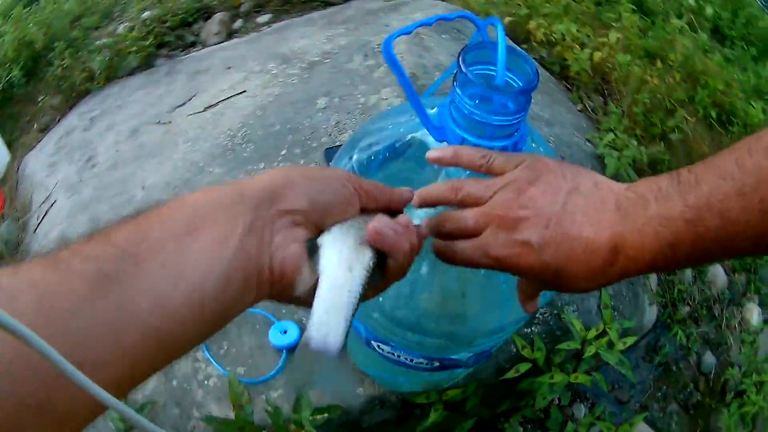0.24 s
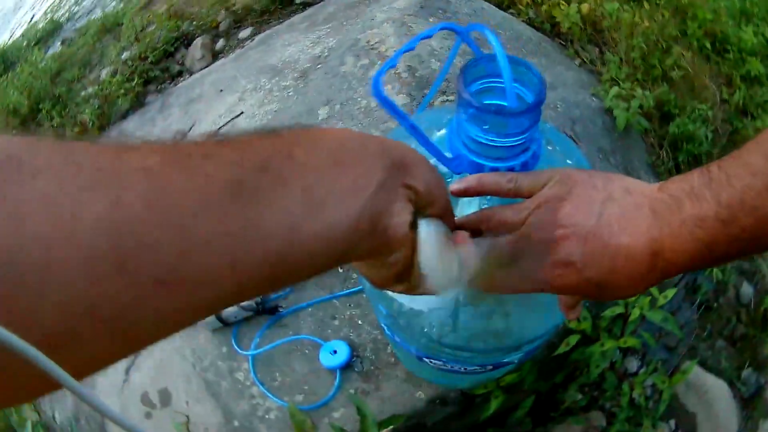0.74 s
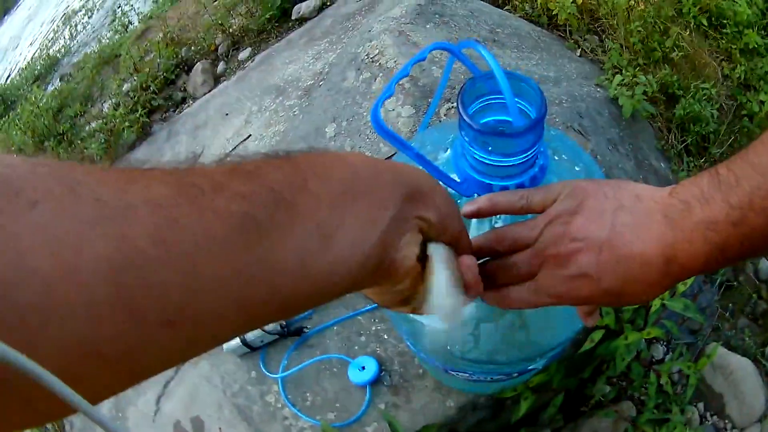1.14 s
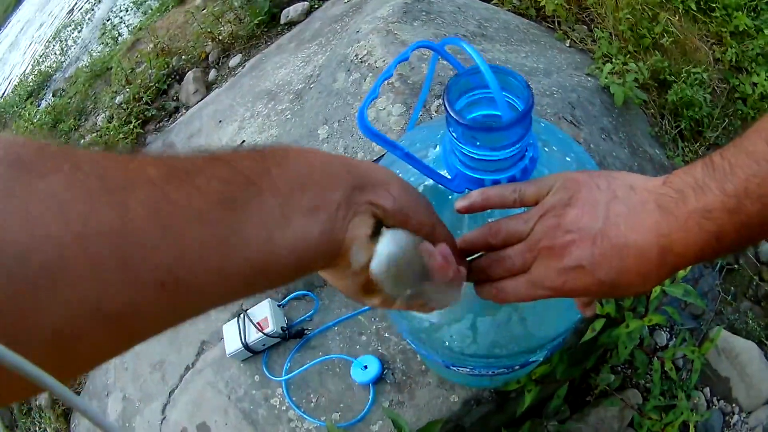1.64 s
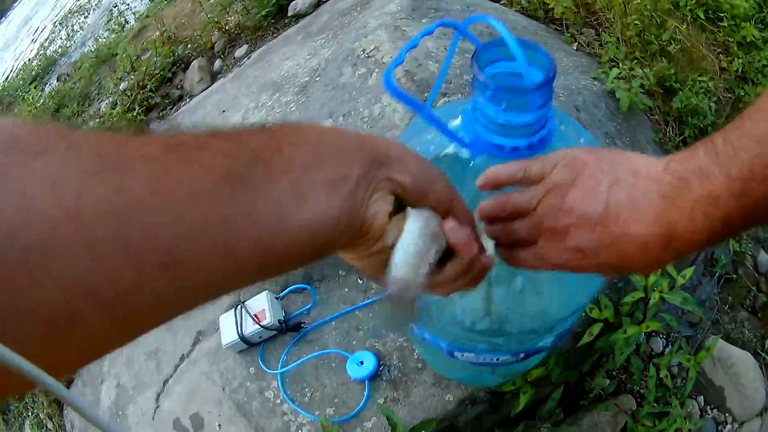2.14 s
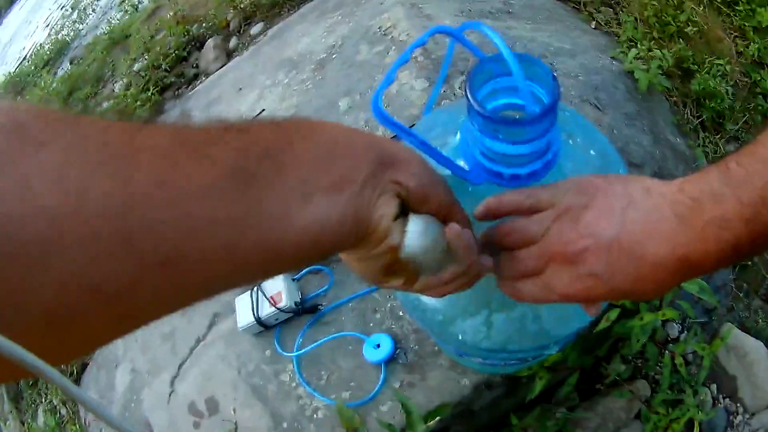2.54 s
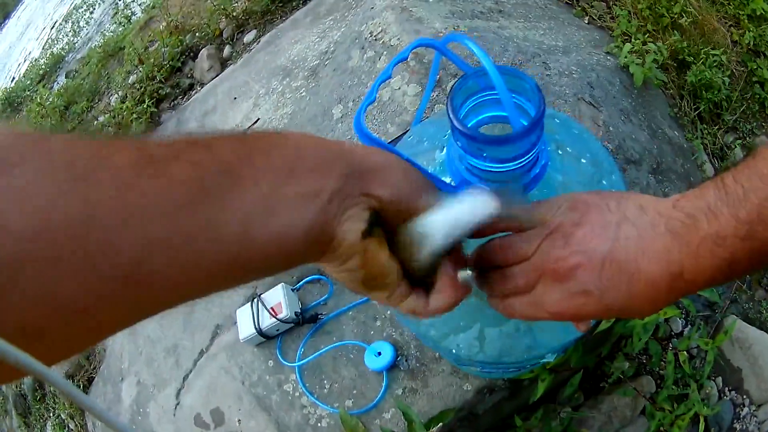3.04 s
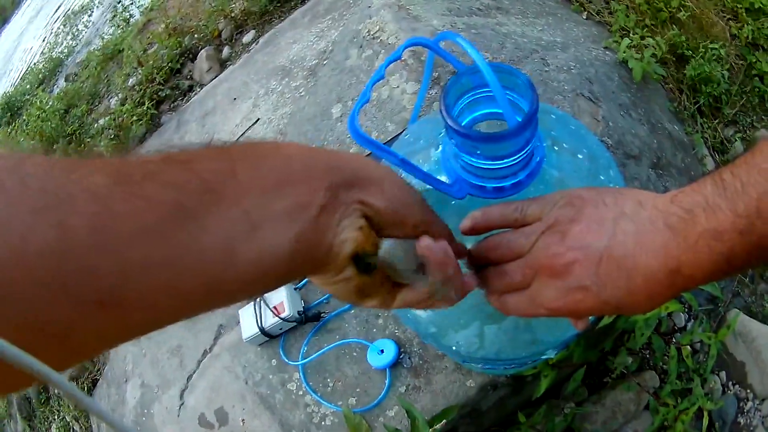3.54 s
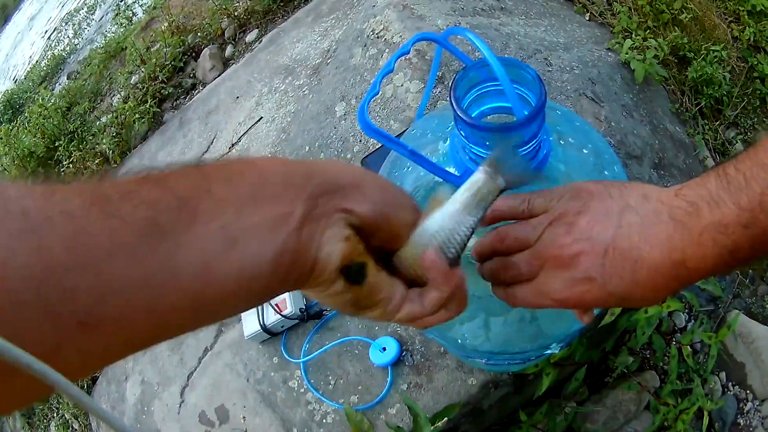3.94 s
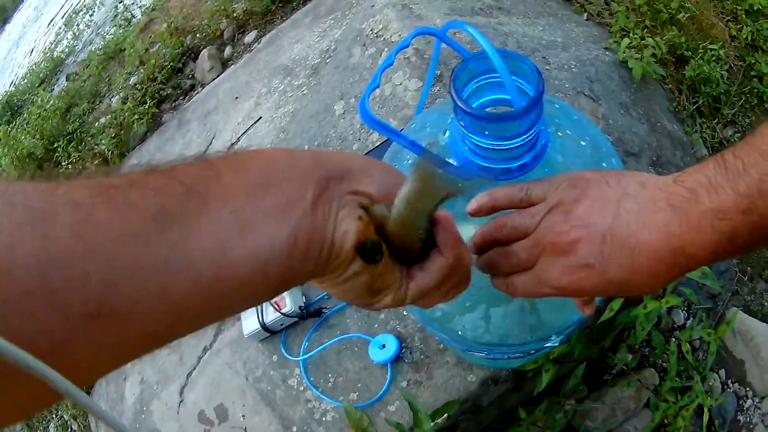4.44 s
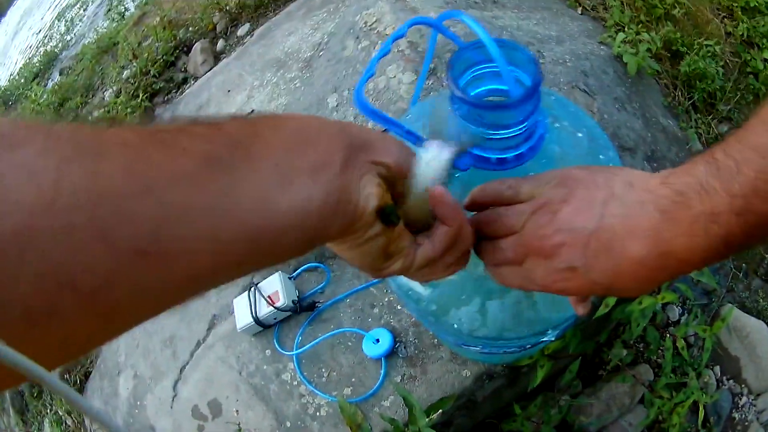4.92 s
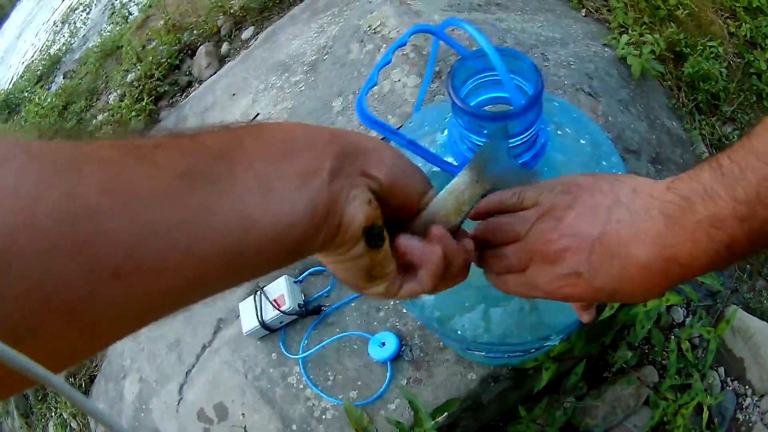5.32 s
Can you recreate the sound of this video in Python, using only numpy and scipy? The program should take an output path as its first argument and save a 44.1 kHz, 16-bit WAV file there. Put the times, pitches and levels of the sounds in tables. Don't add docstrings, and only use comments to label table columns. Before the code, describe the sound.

A riverside heard from one close microphone for about five and a half seconds. Throughout, a small battery air pump buzzes at a steady low rate, its casing knocking quickly and its valve ticking and chattering, giving a dry, nasal rattle. Behind it the river rushes as wide, mostly low and dull noise, and a distant engine drones faintly on two low tones, fading around 1 to 2 seconds, returning, and creeping upward in pitch. In the first 0.2 seconds hands knock a hollow plastic jug in a quick cluster, the loudest crack at about 0.13, with a short wall ring and rattling thin parts. A soft bump follows near 0.6 and a tap at 0.75, then light touches around 1.4, 1.8, 2.0 and 2.2, and fainter ones near 3.2 and 3.4. A hard, blunt thump lands at about 4.5, followed by tiny taps near 5.0 and 5.3.

```python
import sys
import numpy as np
from scipy import signal
from scipy.fft import rfft, irfft
from scipy.io import wavfile
from scipy.ndimage import uniform_filter1d

SR = 44100
rng = np.random.default_rng(int(sys.argv[2]) if len(sys.argv) > 2 else 0)


def put_to_file(sound):
    columns = np.atleast_2d(sound).T
    safe = np.clip(columns, -1, 1)
    whole_steps = np.round(safe * 32767)
    wavfile.write(sys.argv[1], SR, whole_steps.astype(np.int16))


def magnitude_from_level(level_db):
    exponent = np.asarray(level_db, float) / 20
    return 10 ** exponent


N = 246078


def evened(x):
    return x / np.sqrt(np.mean(x ** 2) + 1e-20)


def read(points, hz):
    f, value = np.transpose(points)
    return np.interp(np.log(hz + 1), np.log(f + 1), value)


def add(mix, s, sound):
    part = mix[round(s * SR):][:len(sound)]
    part += sound[:len(part)]


def swing(t, hz, peak_db, t60, cycles):
    build_up = (1 - np.exp(-t * hz / cycles)) ** 2
    return magnitude_from_level(peak_db - 60 * t / t60) * np.sin(2 * np.pi * hz * t) * build_up


# time in seconds, firing pitch in Hz, level in dB.
ENGINE = [(0, 53, -48), (.75, 50.2, -56), (1, 54.4, -67), (2, 52.2, -72), (2.3, 52.76, -52.5),
          (2.801, 52.4, -52), (3.049, 53.4, -46), (3.751, 56.2, -51.5), (3.95, 59.7, -48), (4.201, 59, -65),
          (4.5, 60.6, -50), (5.3, 61.5, -56), (5.6, 63, -55)]


def engine():
    s, *columns = np.transpose(ENGINE)
    hz, level_db = (np.interp(np.arange(N) / SR, s, column) for column in columns)
    angle = 2 * np.pi * np.cumsum(hz) / SR
    throb_db = 0.56 * evened(uniform_filter1d(rng.standard_normal(N), 3000))
    tones = np.sin(angle) + 0.74 * np.sin(2 * angle)
    return np.sqrt(2) * magnitude_from_level(level_db + throb_db) * tones


# frequency in Hz, density in dB per Hz.
RIVER = [(20, -20), (40, -16), (100, -2.5), (380, -1.5), (550, -6), (700, -10), (1100, -11), (1450, -22),
         (2300, -34), (2700, -34.5), (3200, -40), (6500, -47.5), (7500, -53.5), (11000, -55),
         (13000, -53.5), (15500, -53)]


def river():
    frames, hz = N // 256 + 5, np.fft.rfftfreq(1024, 1 / SR)
    real, imaginary, patches = rng.standard_normal((frames, 513, 3)).T
    patches = evened(uniform_filter1d(uniform_filter1d(patches, 8, 0), 12, 1))
    patchy_db = np.where(hz > 6900, .7, 1.2)[:, None]
    treble = (np.clip(hz / 3000, 0, 1) * (hz < 7000))[:, None]
    flicker = evened(uniform_filter1d(rng.standard_normal(frames), 4)) * treble
    level_db = read(RIVER, hz)[:, None] + patchy_db * patches + 0.97 * flicker
    z = (real + 1j * imaginary) * magnitude_from_level(level_db)
    return magnitude_from_level(-39) * evened(signal.istft(z, nperseg=1024, noverlap=768)[1][:N])


# start in seconds, strength in dB, pitch in Hz, t60 in seconds.
THUMPS = [(0.00067, -26, 270, 0.19), (0.037, -18.5, 253, 0.05), (0.073, -30.5, 250, 0.32),
          (3.17, -24.5, 165, 0.075), (.0675, -21, 667, 0.044), (.088, -21, 560, 0.033),
          (2.2195, -23.5, 940, 0.024), (1.3775, -27.5, 810, 0.029), (4.492, -26, 650, 0.1),
          (.5705, -8, 262, .013), (1.761, -23, 310, .04), (1.7636, -13, 135, .035),
          (1.7776, -12, 155, .022), (.136, -26, 1850, .14), (4.4844, -13, 497, .04),
          (4.4862, 11, 307, .008), (4.4867, -14, 353, .056), (4.4948, -25, 294, .15),
          (4.4857, -26.5, 1300, 0.019), (4.4866, -26, 860, 0.021)]


def thumps():
    out = np.zeros(N)
    t = np.arange(SR // 4) / SR
    for s, peak_db, hz, t60 in THUMPS:
        add(out, s, swing(t, hz, peak_db, t60, .3))
    return out


# pitch in Hz, level in dB.
PARTS = [(1820, -3), (2110, 7.5), (2400, -3.5), (2850, 3.5), (3200, -0.5), (3640, -2), (3850, -5.5),
         (4300, 1.5), (4680, 1.5), (5100, -4), (5500, 2), (6050, 2)]


def part_ring(peak_db, t60, main_hz, second_hz, noise):
    reach_db, second_db = 56, -5
    t = np.arange(noise.shape[1]) / SR
    rattle = 1.1 + .6 * evened(uniform_filter1d(uniform_filter1d(noise, 70), 70))
    out = 0
    for (hz, db), rough in zip(PARTS, rattle):
        near_main = -reach_db * abs(np.log2(hz / main_hz))
        near_second = second_db - reach_db * abs(np.log2(hz / second_hz))
        out = out + swing(t, hz, peak_db + db + max(near_main, near_second), t60, 0.58) * rough
    return out


# start in seconds, peak in dB, t60 in seconds,
# main struck pitch in Hz, second struck pitch in Hz.
RINGS = [(.008, -39, .05, 2400, 5100), (.032, -47, 0.081, 3850, 4680), (.0666, -44.5, .04, 5500, 6050),
         (.072, -54, .09, 4300, 4680), (.09, -41.5, .04, 3640, 5100), (.099, -36, 0.052, 2400, 4300),
         (.1096, -28, 0.03, 2110, 2800), (.113, -34, 0.065, 4300, 5500), (.1316, -27.5, 0.021, 3180, 2110),
         (.142, -40, 0.063, 4680, 3850), (.7045, -57, .02, 3200, 4680), (.7507, -34.5, .025, 1820, 2800),
         (.7506, -44, .027, 5100, 6050), (.756, -54, 0.076, 3850, 4680), (.768, -54, .03, 2800, 6050),
         (1.377, -44, .03, 2400, 3640), (1.384, -45.5, 0.058, 3640, 2110), (1.39, -49.5, 0.042, 2110, 4300),
         (1.763, -55, 0.042, 1820, 3200), (1.9888, -45, 0.023, 2920, 3850),
         (2.2198, -45.5, 0.033, 3200, 2110), (2.226, -52, .04, 3870, 2400), (3.385, -54, .036, 2400, 3640),
         (5.2634, -57.5, 0.023, 5500, 3200)]


def part_rings():
    out = np.zeros(N)
    for s, *row in RINGS:
        add(out, s, part_ring(*row, rng.standard_normal((len(PARTS), 4096))))
    return out


# frequency in Hz, level in dB.
CRACK = [(450, -12), (780, -6), (1200, -7.5), (1700, 4.5), (2400, -16), (3200, -18.5), (4500, -26),
         (6300, -29.5), (7500, -54), (8200, -77), (9300, -40), (10300, -59), (11500, -43.5), (15500, -66.5)]
# pitch in Hz, level in dB, t60 in seconds.
JUG = [(183.7, -2, 0.26), (172.2, -9.5, 0.25), (154, -16, 0.039), (410, 2.5, 0.061), (463.5, 3, 0.049),
       (1136, 3.5, 0.034), (1679, -2, 0.031), (1836, -20, .1)]


def tap(crack_db, bright_db, t60, ring_db):
    noise = rng.standard_normal(8192)
    t, hz = np.arange(len(noise)) / SR, np.fft.rfftfreq(len(noise), 1 / SR)
    tilt_db = bright_db * np.log2(np.clip(hz, 300, 7000) / 1500)
    colour = magnitude_from_level(read(CRACK, hz) + tilt_db)
    hold = 0.049 * t60
    shape = np.clip(t / 0.0002, 0, 1) * magnitude_from_level(-60 * np.maximum(t - hold, 0) / t60)
    crack = magnitude_from_level(crack_db) * evened(irfft(rfft(noise) * colour)) * shape
    t = np.arange(SR // 2) / SR
    wall = sum(swing(t, f, ring_db + db, decay, 0.39) for f, db, decay in JUG)
    add(wall, 0, crack)
    return wall


# start in seconds, crack level in dB, brightness in dB per octave,
# crack t60 in seconds, jug ring level in dB.
TAPS = [(.0005, -45, 2, 0.05, -55), (.008, -39.5, 10, 0.042, -27.5), (0.0327, -36, 6, .04, -32.5),
        (.067, -33, 6, 0.037, -29.5), (.089, -50, 8, 0.028, -37.5), (.099, -38.5, 9.5, .05, -24.5),
        (0.11, -20, 6, 0.043, -17), (.119, -40, 13, 0.052, -44), (0.132, -6.5, -4, 0.048, -7),
        (.139, -38.5, 12, 0.037, -46), (0.7043, -45.5, 5.5, 0.017, -66), (0.751, -30.5, -1, 0.036, -65),
        (.768, -47, 8.5, .03, -52), (1.378, -46, 0, .03, -46), (1.384, -47, 6, .03, -49),
        (1.763, -41, -1, .04, -44.5), (1.989, -42.5, 0.5, 0.016, -72), (2.2197, -35, 0.5, 0.026, -34),
        (3.382, -56, 8, 0.044, -62), (5.012, -41, -3.5, 0.028, -52), (5.074, -60.5, 13.5, 0.027, -60),
        (5.2653, -49.5, 6, .025, -72)]


def taps():
    out = np.zeros(N)
    for s, *row in TAPS:
        add(out, s, tap(*row))
    return out


def hands():
    touches = taps() + part_rings() + thumps()
    return signal.sosfilt(signal.butter(6, 125, "high", fs=SR, output="sos"), touches)


def ring(hz, width, db, size=1600):
    t = np.arange(size) / SR
    swell = magnitude_from_level(db) * (np.pi * width) ** 2 / 42.6 * t
    return swell * np.exp(-np.pi * width * t) * np.sin(2 * np.pi * hz * t)


def knocks(turns, place, uneven_db, late):
    count = int(turns[-1])
    chance = rng.standard_normal((count, 2))
    when = np.arange(count) + place + late * chance[:, 0]
    at = np.interp(when, turns, np.arange(N - 1.))
    whole, size, out = at.astype(int), magnitude_from_level(uneven_db * chance[:, 1]), np.zeros(N)
    out[whole] = size * (1 - at + whole)
    out[whole + 1] = size * (at - whole)
    return out


STROKES = [
    (.6893, 1.0),
    (1.0073, 1.1),
    (.1605, -.17),
    (.5928, -.34),
]
# pitch in Hz, width in Hz, level in dB, direction of first swing.
CASING = [(1029, 200, -51.7, -1), (1151, 76, -59.2, 1), (1257, 159, -57.7, 1), (1375, 70, -56, 1)]


def casing_knocks(turns):
    blows = sum(push * knocks(turns, place, .8, .0006) for place, push in STROKES)
    casing = sum(way * ring(hz, width, db) for hz, width, db, way in CASING)
    return magnitude_from_level(0.1) * signal.oaconvolve(blows, casing)


# pitch in Hz, width in Hz, level in dB.
VALVE = [(380, 160, -55), (1545, 100, -64), (1700, 350, -71), (2700, 800, -83), (4500, 1200, -104),
         (3500, 60, -87), (3350, 600, -82.5)]
# pitch in Hz, width in Hz, level in dB.
REED = (2150, 450, -81)


def valve_ticks(turns):
    flap = knocks(turns, .99, 1.5, .0015)
    chatter = knocks(turns, .21, 3, .008) + .6 * knocks(turns, .43, 3, .008)
    valve = [ring(*mode) for mode in VALVE]
    ticks = signal.oaconvolve(flap, sum(valve)) + signal.oaconvolve(chatter, valve[2])
    return ticks + signal.oaconvolve(knocks(turns, .11, 3, .006), ring(*REED))


# time in seconds, turns per second.
SPEED = [(0.07, 42.85), (0.21, 42.58), (0.49, 42.66), (0.63, 42.28), (1.19, 42.5), (1.47, 42.3),
         (1.89, 42.55), (2.03, 42.37), (2.87, 42.65), (3.01, 42.46), (3.99, 42.86), (4.13, 42.51),
         (4.69, 42.52), (4.97, 42.78), (5.25, 42.82), (5.45, 42.53)]


def pump():
    turns = np.cumsum(np.interp(np.arange(N - 1) / SR, *np.transpose(SPEED))) / SR
    return (casing_knocks(turns) + valve_ticks(turns))[:N]


def scene():
    return (engine() + river() + hands() + pump())[None]


def limited(x):
    bent = np.sign(x) * (.7 + .29 * np.tanh((abs(x) - .7) / .29))
    return np.where(abs(x) > .7, bent, x)


def gated(x, from_hz, floor_db):
    hz, _, z = signal.stft(x, SR, "cosine", nperseg=2048, noverlap=1024)
    chance = rng.standard_normal((34, z.shape[1]))
    wander_db = (.7 * chance[1:] + .8 * chance[0]).repeat(32, 0)[:len(hz)]
    limit = magnitude_from_level(floor_db + wander_db)
    rounded = np.maximum(1.9 * limit / (abs(z) + 1e-12), 1) * (abs(z) > limit)
    keep = np.where(hz[:, None] < from_hz, 1, rounded)
    return signal.istft(z * keep, SR, "cosine", nperseg=2048, noverlap=1024)[1][:len(x)]


def top_cut(x):
    return signal.sosfilt(signal.butter(12, 15760, fs=SR, output="sos"), x)


def record(dry):
    padded = np.pad(limited(dry)[0], (42, 0))
    sparse = gated(padded, 7000, -101.2)[None, 42:]
    return top_cut(sparse)


dry = scene()
out = record(dry)
put_to_file(out)
```